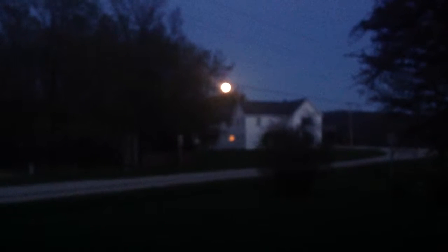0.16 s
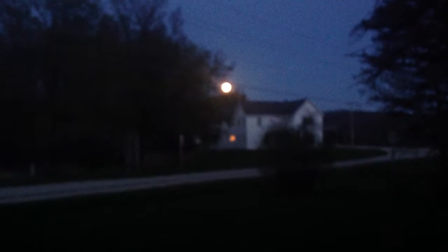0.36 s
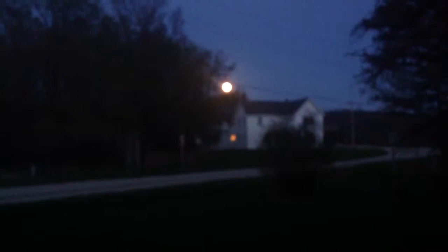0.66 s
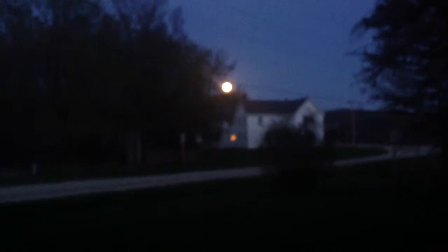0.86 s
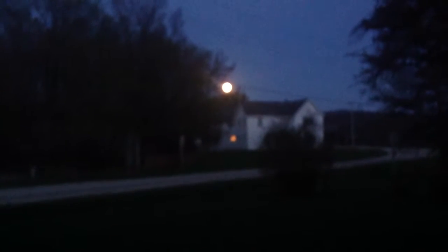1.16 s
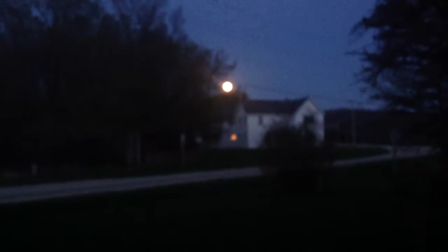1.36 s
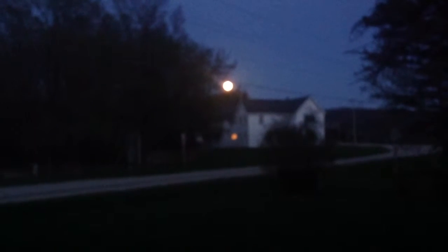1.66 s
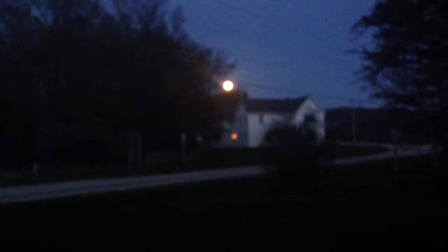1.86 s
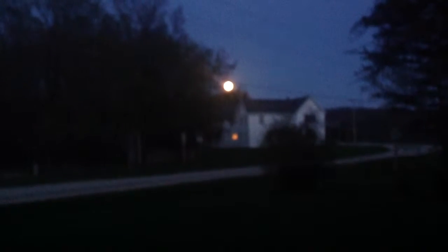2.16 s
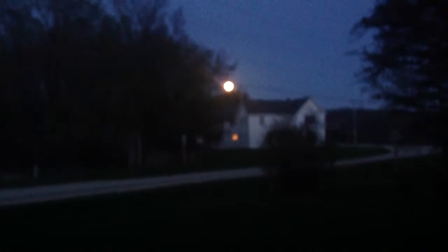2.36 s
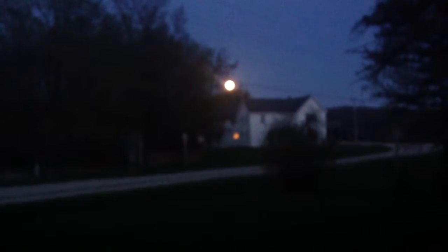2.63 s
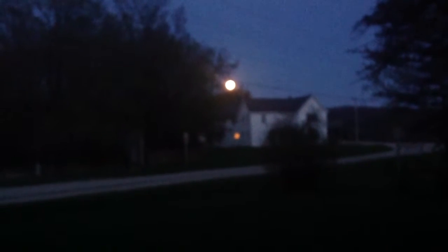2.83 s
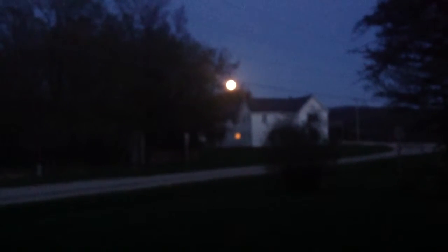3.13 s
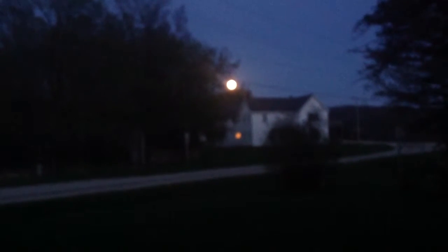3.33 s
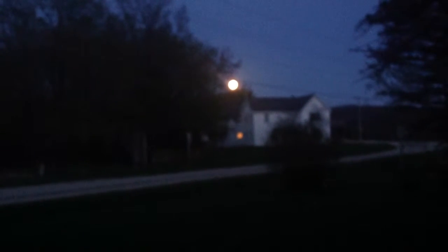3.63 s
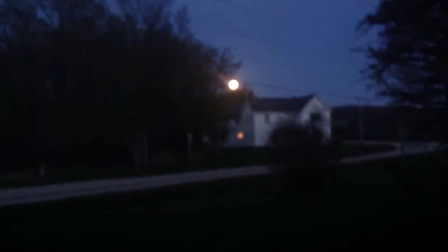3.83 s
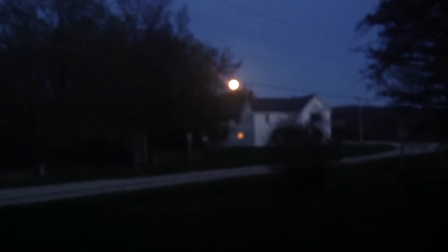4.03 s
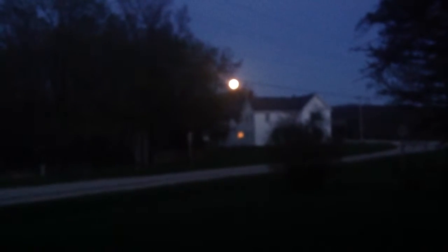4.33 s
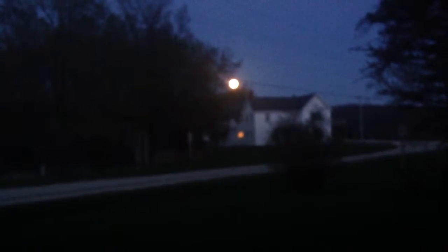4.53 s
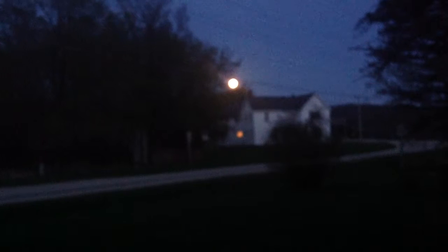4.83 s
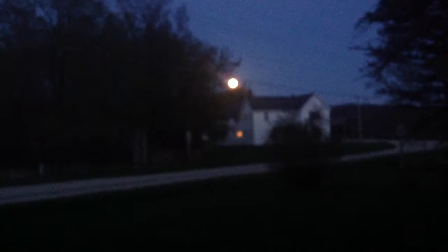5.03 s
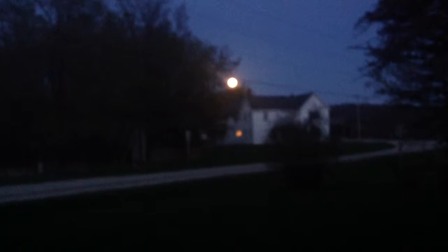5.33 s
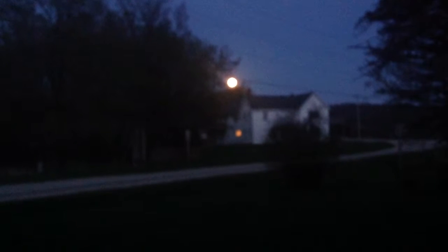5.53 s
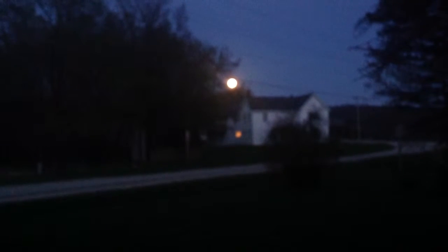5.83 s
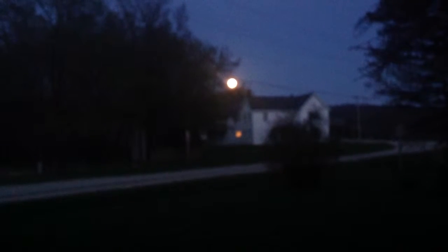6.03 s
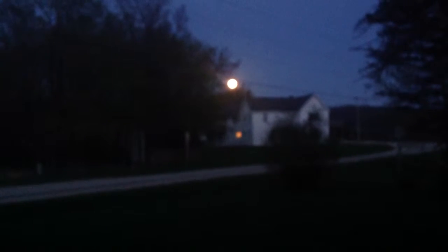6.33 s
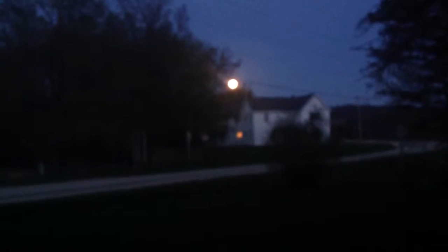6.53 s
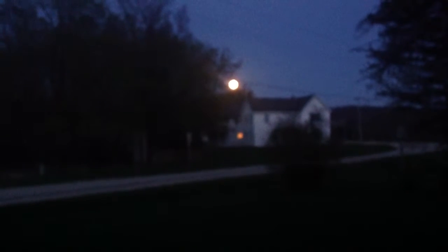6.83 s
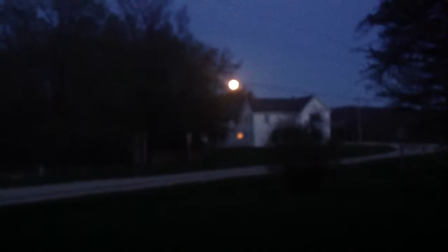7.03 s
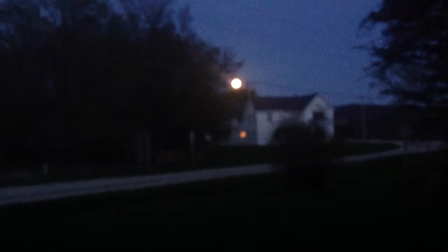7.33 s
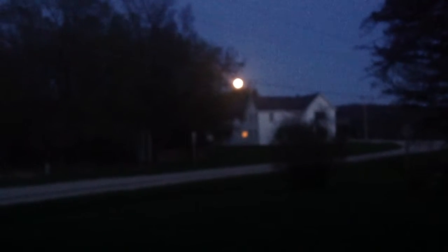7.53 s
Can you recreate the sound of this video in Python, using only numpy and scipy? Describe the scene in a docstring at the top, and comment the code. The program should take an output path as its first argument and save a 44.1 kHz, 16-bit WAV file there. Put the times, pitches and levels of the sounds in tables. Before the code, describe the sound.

At nightfall outdoors, countless tiny frogs whistle shrilly over a steady bed of lower toad trills, with faint rumble and hiss beneath.

```python
"""A spring chorus at dusk, heard across a lawn: many small frogs peep in short rising whistles near 3 kHz,
each a gliding sine under a swelling envelope. Toads hold long trills nearly an octave lower, made of
tone pulses some 40 a second. Trees smear the calls with echoes, made by decaying noise. Under them lie
a far rumble, a faint hum and microphone hiss, runs of faint high chips (noise bands) and a few soft thumps."""
import sys
import numpy as np
from scipy import signal
from scipy.fft import rfft, irfft, next_fast_len
from scipy.io import wavfile
from scipy.ndimage import map_coordinates

SR = 44100
rng = np.random.default_rng(int(sys.argv[2]) if len(sys.argv) > 2 else 0)


def bounce(signal):
    """Save signal as a 16-bit WAV file at the path given by the first command-line argument."""
    frames = np.transpose(np.atleast_2d(signal))
    limited = np.clip(frames, -1, 1)
    pcm = np.round(limited * 32767).astype(np.int16)
    wavfile.write(sys.argv[1], SR, pcm)


N = 339129


def amp(db):
    """Level to amplitude: 20 dB is a factor of ten."""
    return 10 ** (np.asarray(db) / 20)


def unit(x):
    """Normalization: x scaled to a root-mean-square of 1."""
    return x / np.sqrt(np.mean(x ** 2) + 1e-20)


def clock():
    """Sampling: the time of each sample in seconds."""
    return np.arange(N) / SR


def curve(rows):
    """Linear interpolation: (seconds, value) rows joined by straight lines."""
    return np.interp(clock(), *np.transpose(rows))


def wobble(rate):
    """Slow random modulation: a smooth curve through random knots, rate of them a second."""
    knots = rng.standard_normal(int(N * rate / SR) + 4)
    coarse = np.linspace(0, N / SR, 2048)
    smooth = map_coordinates(knots, [coarse * rate])
    return np.interp(clock(), coarse, smooth)


def filtered(x, response):
    """Linear filtering: the spectrum of x times a response of frequency."""
    m = next_fast_len(N + SR // 2)  # zero padding keeps the end off the start
    hz = np.fft.rfftfreq(m, 1 / SR)
    return irfft(rfft(x, m) * response(hz), m)[:N]


def noise(spectrum):
    """Spectral shaping: white noise given a (Hz, dB) spectrum, at rms 1."""
    f, db = np.transpose(spectrum)

    def response(hz):
        return amp(np.interp(np.log(hz + 1), np.log(f), db))

    return unit(filtered(rng.standard_normal(N), response))


def add(track, s, sound):
    """Superposition: mix a sound into the track from time s on."""
    start = round(s * SR)
    lo, hi = max(start, 0), min(start + len(sound), N)
    if hi > lo:
        track[lo:hi] += sound[lo - start:hi - start]


def woods(x, t60, wet_db):
    """Reverberation: direct sound plus scatter from trunks and branches, falling 60 dB in t60 seconds."""
    t = np.arange(SR) / SR
    tail = rng.standard_normal(SR) * amp(-60 * t / t60)
    echo = signal.fftconvolve(x, tail / np.linalg.norm(tail))[:N]
    return (x + amp(wet_db) * echo) / np.hypot(1, amp(wet_db))


def envelope(u, crest, power):
    """Amplitude envelope: a sine arch over u = 0 to 1, skewed to peak at crest; more power narrows it."""
    swell = np.interp(u, [0, crest, 1], [0, .5, 1])
    return np.abs(np.sin(np.pi * swell)) ** power


def peep(length, start_hz, end_hz):
    """Frequency glide: the vocal sac swells, the pitch climbs, and the note closes quickly."""
    u = np.linspace(0, 1, max(int(length * SR), 2))
    pitch_hz = start_hz + (end_hz - start_hz) * u ** 1.26  # the climb steepens
    phase = 2 * np.pi * np.cumsum(pitch_hz) / SR
    return envelope(u, crest=.74, power=.65) * np.sin(phase)


def crowd(pitches, period, length, glide_hz, best_hz=3050, fade_hz=250):
    """Incoherent sum: each frog repeats a rising note at its own pace; voices far from best_hz are weaker."""
    track = np.zeros(N)
    for pitch in pitches:
        pace, size = rng.standard_normal(2)
        voice = 1 / (1 + (abs(pitch - best_hz) / fade_hz) ** 3)
        own_length = length * np.exp(.15 * size)
        gaps = period * np.exp(.15 * pace + .08 * rng.standard_normal(26))
        times = np.cumsum(gaps) - 2 - rng.random()  # calling began before the start
        for s, (shift, stress) in zip(times, rng.standard_normal((len(times), 2))):
            hz = pitch + 22 * shift
            if -length < s < N / SR:
                note = peep(own_length, hz - glide_hz / 2, hz + glide_hz / 2)
                add(track, s, voice * amp(.8 * stress) * note)
    return unit(track)


def far_peepers():
    """Direct-to-reverberant ratio: a clearer near bank of frogs, and a swamp behind it deep in echo."""
    # The far frogs together. Each row: time in seconds, level in dB.
    chorus_level = [(0.0, -51), (0.04, -50.5), (0.9, -48.5), (0.96, -53.5), (1.3, -48), (1.48, -50),
                    (3.62, -49), (3.73, -52.5), (3.81, -50), (6.15, -50), (6.75, -52), (6.79, -47.5),
                    (7.37, -51.5), (7.41, -54.5), (7.54, -49), (7.69, -49.5)]
    bank = crowd(np.linspace(2880, 3400, 38), period=.65, length=.07, glide_hz=190)
    swamp = crowd(np.linspace(2780, 3640, 145), period=.7, length=.07, glide_hz=190)
    bank = woods(bank, t60=.5, wet_db=-8)
    swamp = woods(swamp, t60=.81, wet_db=-1.5)
    voices = swamp + amp(-3) * bank
    return amp(curve(chorus_level)) * unit(voices)


def near_peepers(flutter_db=2.0, vary_hz=16):
    """Amplitude fluctuation: frogs repeat their own notes; paths over the ground make each glide flutter."""
    # Calls. Each row: start in seconds, name of the frog, peak level in dB before flutter and echo.
    calls = [(0.465, "drawling", -56.5), (1.33, "drawling", -58), (2.242, "drawling", -56),
             (3.224, "drawling", -58), (4.146, "drawling", -59), (5.0, "drawling", -62),
             (5.92, "drawling", -67), (6.929, "drawling", -67), (0.115, "sweeping", -51),
             (.82, "sweeping", -52), (6.751, "sweeping", -60), (.472, "low", -55), (1.07, "low", -50.5),
             (1.79, "low", -52), (2.54, "low", -51), (3.08, "low", -54), (3.708, "low", -49.5),
             (4.285, "low", -51), (4.868, "low", -49), (5.464, "low", -47.5), (6.054, "low", -53),
             (6.58, "low", -57), (6.97, "low", -52), (7.31, "low", -55), (0.411, "middle", -45),
             (1.14, "middle", -42.5), (1.839, "middle", -43.5), (2.609, "middle", -50.5),
             (3.3, "middle", -49), (4.044, "middle", -43), (4.778, "middle", -51), (6.058, "middle", -47),
             (6.83, "middle", -52), (7.51, "middle", -44), (.019, "upper", -50), (2.393, "upper", -43.5),
             (2.768, "upper", -47), (5.957, "upper", -44.5), (6.342, "upper", -48), (7.23, "upper", -51),
             (.697, "high", -46.5), (1.295, "high", -42), (2.06, "high", -46.5), (3.465, "high", -45),
             (4.697, "high", -48), (5.22, "high", -48), (5.35, "high", -47.5), (.46, "shrill", -58.5),
             (.989, "shrill", -58), (1.54, "shrill", -62), (2.017, "shrill", -55), (2.683, "shrill", -55),
             (3.246, "shrill", -56), (3.856, "shrill", -62), (4.457, "shrill", -61), (5.17, "shrill", -58),
             (6.45, "shrill", -57.5), (7.1, "shrill", -56)]
    # Each nearer frog's own note, by name: start pitch in Hz before variation, rise in Hz, length in seconds.
    notes = {"drawling": (2480, 330, 0.2), "sweeping": (2600, 320, .11), "low": (2690, 134, 0.073),
             "middle": (2825, 178, .068), "upper": (2960, 165, 0.0525), "high": (3110, 170, 0.0675),
             "shrill": (3397, 260, 0.0638)}
    track = np.zeros(N)
    for (s, frog, db), shift in zip(calls, rng.standard_normal(len(calls))):
        start_hz, rise_hz, length = notes[frog]
        hz = start_hz + vary_hz * shift
        add(track, s, amp(db) * peep(length, hz, hz + rise_hz))
    flutter = amp(flutter_db * wobble(60))
    return woods(track * flutter, t60=.7, wet_db=-3)


def pulse_rate(pitch_hz):
    """Power-law scaling: smaller, higher toads give more pulses a second (41.3 at 1596.7 Hz)."""
    return 41.3 * (pitch_hz / 1596.7) ** .55


def trill(pitch_hz, rate, unsteady, drift_hz=2, scatter_hz=14):
    """Amplitude modulation: pulses of tone with a quick rise, each a little off in phase and pitch."""
    pulses = np.cumsum(rate + .1 * wobble(2)) / SR + rng.random()
    u, index = pulses % 1, pulses.astype(int)  # place within the pulse, pulse number
    slip, detune = rng.standard_normal((2, 1024))[:, index]
    cycles = np.cumsum(pitch_hz + drift_hz * wobble(1)) / SR
    cycles += scatter_hz * detune * (u - .5) / rate
    tone = np.sin(2 * np.pi * cycles + unsteady * slip)
    return unit(envelope(u, crest=.19, power=1.9) * tone)


def far_toads(count=22, low_hz=1565, high_hz=1835, unsteady=1.74):
    """Spectral blurring: overlapping trills of many pitches drift and merge into one purring band."""
    # The far toads together. Each row: time in seconds, level in dB before a lift of 1.75 dB.
    chorus_level = [(0, -57), (1, -56), (3.5, -55), (4.4, -56.5), (5.7, -55), (6.7, -56.5), (7.3, -58.5),
                    (7.69, -57.5)]
    track = np.zeros(N)
    for place in np.linspace(-1, 1, count):
        pitch_hz = np.interp(place, [-1, 1], [low_hz, high_hz])
        effort = amp(-2.5 * place ** 2 + 1.5 * wobble(.7))  # weaker at the band's edges
        rate = pulse_rate(pitch_hz) + 2 * rng.standard_normal()
        track += effort * trill(pitch_hz, rate, unsteady, drift_hz=18)
    return amp(curve(chorus_level) + 1.75) * unit(woods(track, t60=.59, wet_db=-5))


def near_toads():
    """Onset and offset ramps: long trills swell over 0.13 s at the start and stop short within 0.057 s."""
    # Each row: start and end in seconds, pitch in Hz, rms level in dB before ramps and echo,
    # random phase from pulse to pulse in radians.
    toads = [(-1, 4.36, 1348, -70.5, 2), (-1, 4.36, 1398, -69, 2), (-1, 4.9, 1500, -66.5, 1.9),
             (-1, 2.6, 1812, -63.5, 1.4), (2.4, 4.4, 1826, -64, .9), (2.6, 4.9, 1664, -63, 1.3),
             (4.65, 8.2, 1517, -63.5, 1.1), (4.8, 7.15, 1827, -59.3, .45), (5.1, 6.8, 1742, -63, 1.1),
             (4.4, 8.2, 1580, -64, 1.6)]
    t, track = clock(), np.zeros(N)
    for start, end, pitch_hz, db, unsteady in toads:
        rise = np.clip((t - start) / .13, 0, 1)
        fall = np.clip((end - t) / .057, 0, 1)
        track += amp(db) * rise * fall * trill(pitch_hz, pulse_rate(pitch_hz), unsteady)
    return woods(track, t60=.67, wet_db=-6.5)


def background(hum_hz=174, hum_db=-78):
    """Broadband noise: a far rumble with a faint wavering hum, and the microphone's hiss."""
    # Far rumble. Each row: time in seconds, level in dB before a lift of 0.31 dB.
    air_level = [(0, -63.5), (1, -62.5), (3, -63.5), (5.5, -64.5), (7.69, -65)]
    # Spectra of rumble and hiss. Each row: frequency in Hz, relative level in dB per Hz.
    rumble_spectrum = [(20, -35), (45, -31), (70, -19.5), (100, -10.5), (150, 1), (300, -0.5), (600, -3.5),
                       (1200, -7.5), (2050, -16), (4000, -27.5), (9000, -43)]
    hiss_spectrum = [(100, -18), (2000, 3.5), (4000, 0), (4800, 1), (6500, -2), (10000, -4), (14000, -7),
                     (15300, -7.5)]
    hum_phase = 2 * np.pi * np.cumsum(hum_hz + 4 * wobble(12)) / SR
    hum = np.sin(hum_phase) * amp(hum_db + 3 * wobble(6))
    rumble = amp(curve(air_level) + .31) * noise(rumble_spectrum)
    return rumble + hum + amp(-67.5) * noise(hiss_spectrum)


def chips(width_hz=430, half_length=.028):
    """Band-pass noise bursts: runs of a small animal's faint raspy chips swell and fade."""
    # Each row: first chip in seconds, number of chips, gap in seconds, pitch in Hz,
    # level in dB at mid-run before echo.
    runs = [(.26, 6, 0.1, 4830, -69.5), (3.28, 5, .138, 5000, -73), (6.635, 4, .128, 5470, -67)]
    t, track = clock(), np.zeros(N)
    for start, count, gap, pitch_hz, db in runs:
        def band(hz):
            return np.exp(-.5 * ((hz - pitch_hz) / width_hz) ** 2)

        rasp = unit(filtered(rng.standard_normal(N), band))
        for k, place in enumerate(np.linspace(-1, 1, round(count))):
            burst = np.exp(-((t - start - k * gap) / half_length) ** 2)
            track += amp(db - 2.5 * place ** 2) * burst * rasp  # a run's ends are 2.5 dB weaker
    return woods(track, t60=.45, wet_db=-4)


def thumps(cycles=1.0):
    """Windowed sine bursts: each soft thump swells and fades evenly; the first has a weak rebound."""
    # Each row: center in seconds, pitch in Hz, level in dB of the bell-shaped envelope's peak.
    bursts = [(1.3715, 426, -45.5), (1.379, 480, -56), (4.07, 65, -77), (7.6, 95, -71)]
    t, track = clock(), np.zeros(N)
    for s, hz, db in bursts:
        bell = np.exp(-((t - s) * hz / cycles) ** 2)  # a few cycles long
        track += amp(db) * bell * np.sin(2 * np.pi * hz * (t - s))
    return track


def scene():
    """Superposition: the pressures of all sources add, in one channel."""
    frogs = near_peepers() + far_peepers()
    toads = near_toads() + far_toads()
    return (frogs + toads + chips() + thumps() + background())[None]


def record(dry):
    """Band limiting: nothing passes from 15.3 kHz up."""
    return filtered(dry[0], lambda hz: hz < 15300)[None]


dry = scene()
out = record(dry)
bounce(out)
```